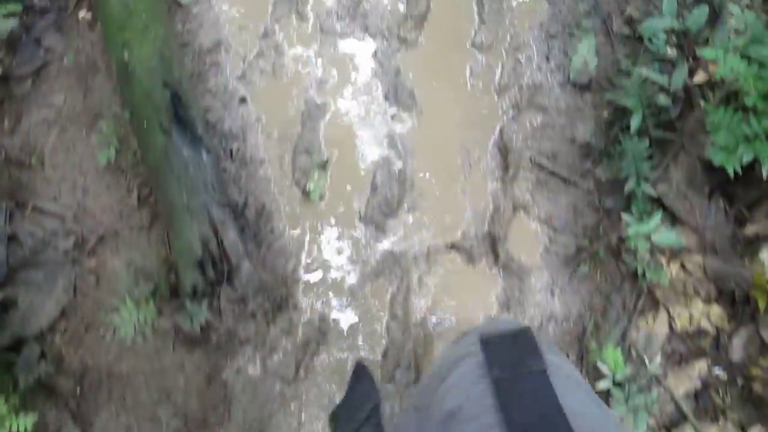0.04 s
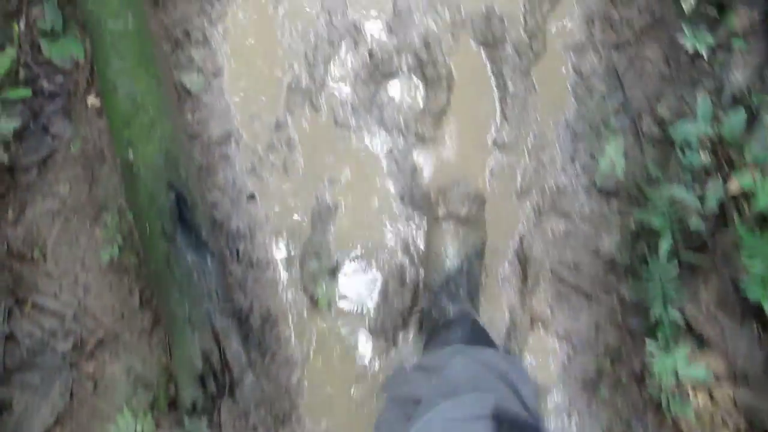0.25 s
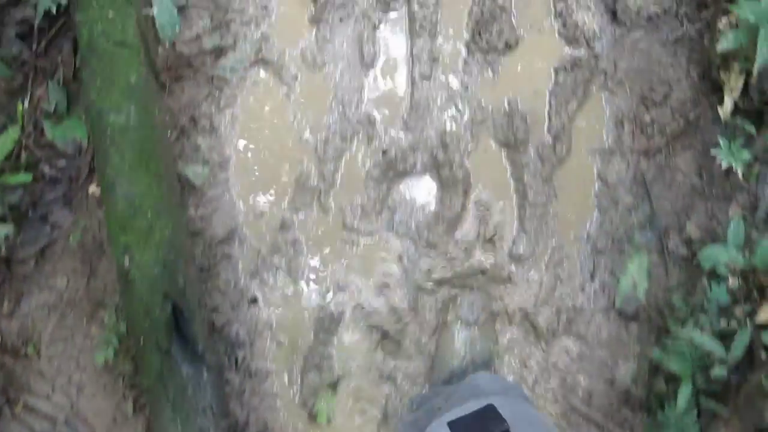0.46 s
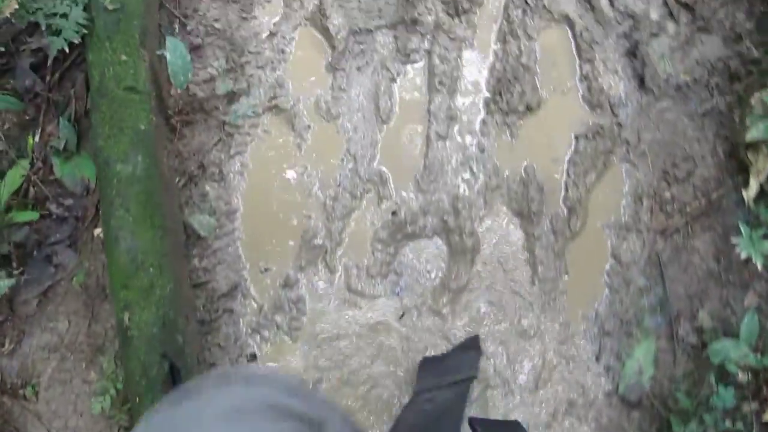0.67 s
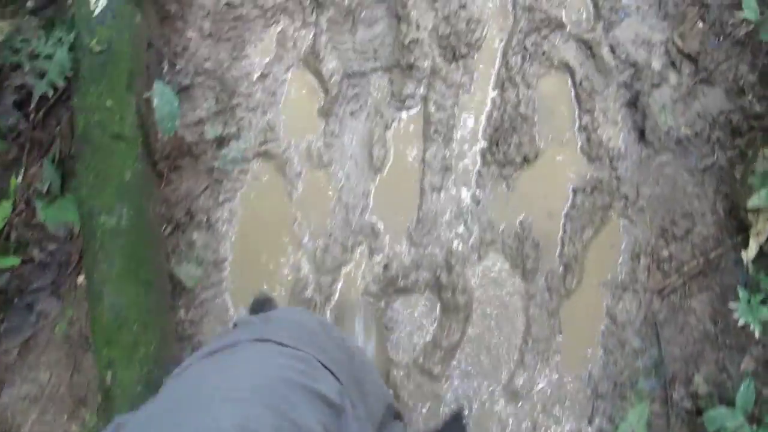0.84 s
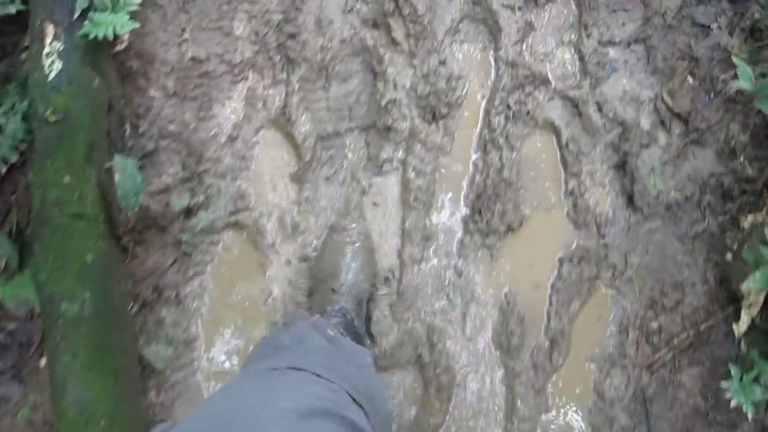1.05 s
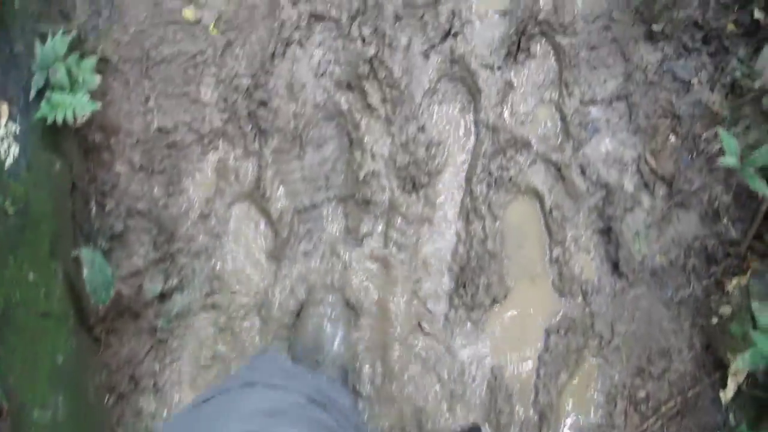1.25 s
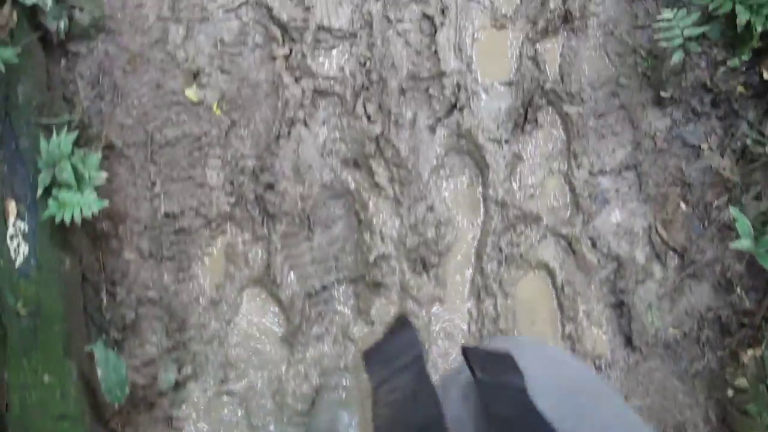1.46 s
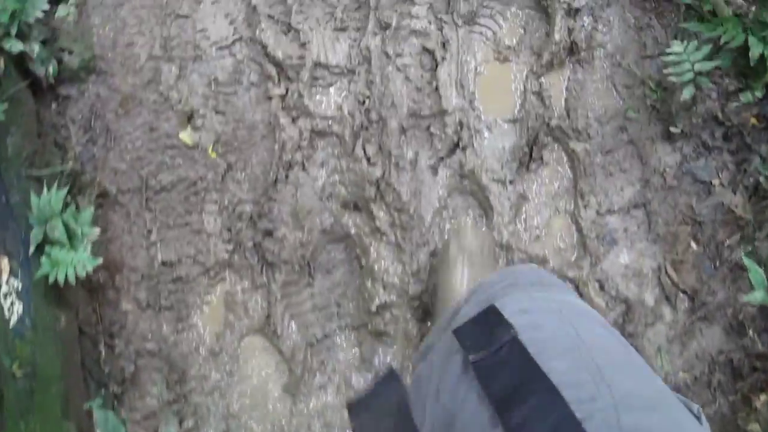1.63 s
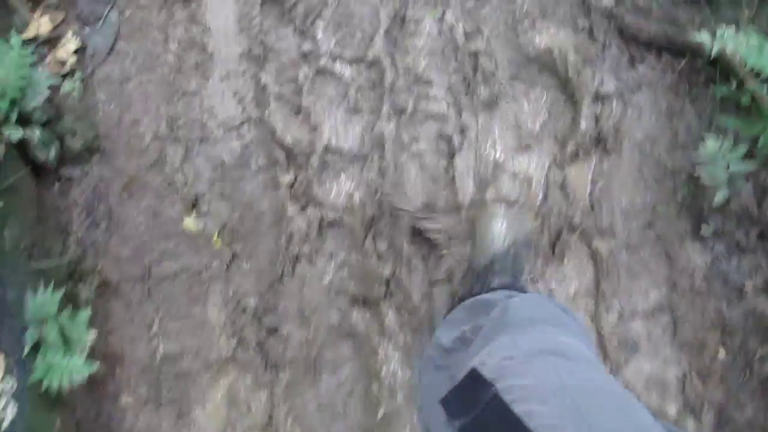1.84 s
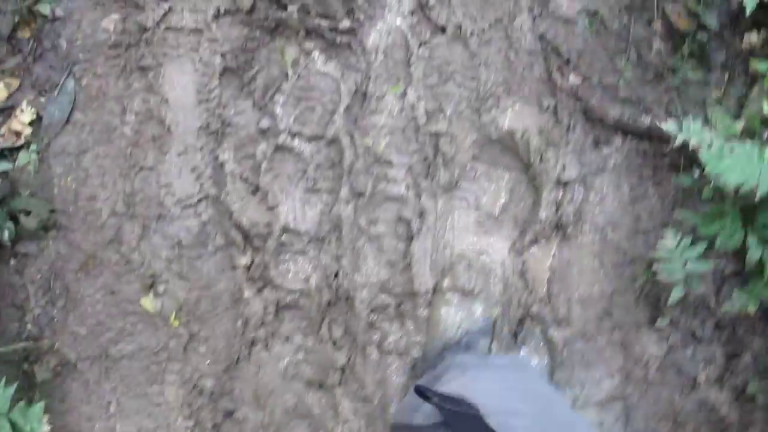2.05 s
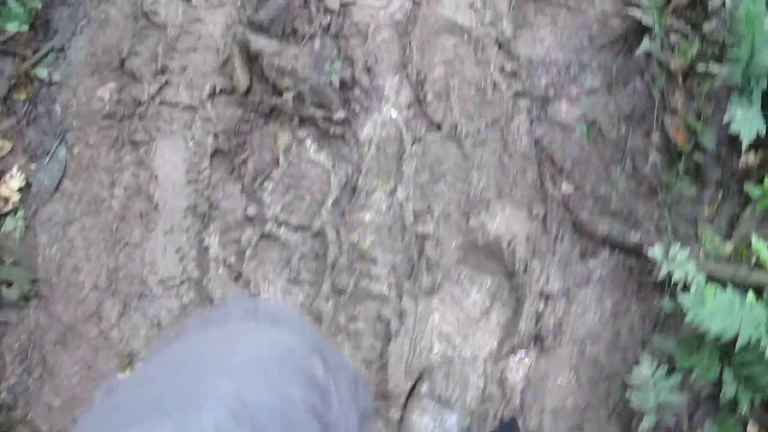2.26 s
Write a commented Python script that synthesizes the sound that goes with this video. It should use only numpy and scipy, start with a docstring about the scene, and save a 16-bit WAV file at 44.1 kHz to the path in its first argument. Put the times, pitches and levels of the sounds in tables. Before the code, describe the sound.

Boots squelching through wet mud, three steps, over a faint hiss of forest insects.

```python
"""Rubber boots in wet mud.

Three steps on a forest trail. Each squeezes out clouds of tiny bursting bubbles; air pockets pop,
a few larger bubbles gulp upward in pitch, and the heel thuds softly. The mud sounds scatter off
legs, ground and trees. Behind them: a faint low rumble and the steady hiss of insects."""
import sys
import numpy as np
from scipy import signal
from scipy.fft import rfft, irfft, next_fast_len
from scipy.io import wavfile
from scipy.ndimage import uniform_filter1d, map_coordinates

SR = 44100
rng = np.random.default_rng(int(sys.argv[2]) if len(sys.argv) > 2 else 0)


def store_wav(level_fs):
    """Save 16-bit WAV to argv[1]."""
    pcm = np.round(np.clip(np.atleast_2d(level_fs), -1, 1) * 32767)
    wavfile.write(sys.argv[1], SR, pcm.T.astype(np.int16))


N = 105840

# Mud and water squirting under the boots. Each row: peak time, rise and fall in seconds,
# level in dB, bubble pitch in Hz, pitch spread in octaves.
SQUIRTS = [ (.236, 0.026, .018, -37, 5930, 0.8), (.29, 0.013, 0.011, -25, 4760, 0.64),
           (0.332, 0.014, 0.01, -36, 2040, 0.68), (0.369, 0.0088, 0.022, -24.5, 2770, 0.56),
           (0.395, 0.048, 0.028, -27.5, 3760, 0.82), (0.464, 0.044, 0.027, -40.5, 3200, 0.46),
           (0.475, .008, 0.0063, -38, 760, 0.16), (0.524, 0.021, 0.0064, -37.5, 2100, 0.67),
           (0.556, 0.011, 0.018, -33.5, 3330, 0.77), (.76, 0.087, .06, -41, 4170, 0.53),
           (.78, 0.22, 0.13, -53.5, 730, 0.41), (0.9116, 0.00025, 0.0044, -20, 5400, 1.1),
           (0.9145, 0.00042, 0.0031, -31, 610, 0.75), (0.916, 0.0042, 0.011, -23.5, 4900, 0.37),
           (0.944, 0.029, .03, -31, 4060, 0.64), (0.947, 0.004, 0.012, -34, 1200, 0.7),
           (1.016, 0.011, 0.01, -34.5, 6840, 0.43), (1.058, 0.0033, 0.0031, -18, 3480, 0.71),
           (1.108, 0.043, 0.025, -28, 4000, 0.82), (1.18, 0.054, 0.055, -40, 2900, 0.53),
           (1.271, 0.014, 0.006, -38, 3920, 0.87), (1.43, 0.21, 0.11, -43, 3720, 0.71),
           (1.539, 0.014, 0.022, -41, 3720, .9), (1.675, 0.014, 0.0065, -27.5, 4070, 0.81),
           (1.691, 0.0031, 0.0024, -17.5, 5500, 1.07), (1.702, 0.017, 0.089, -31.5, 4070, 0.62),
           (1.763, 0.0046, 0.022, -29.5, 1570, 0.56), (1.795, .014, 0.0098, -28, 1060, 0.27),
           (1.803, 0.023, 0.011, -26, 3360, 0.64), (1.81, .002, 0.0027, -25, 4500, 1.2),
           (1.85, 0.013, 0.0058, -21.5, 3000, 0.65), (1.885, 0.022, 0.014, -36.5, 2600, 0.37),
           (1.914, 0.002, 0.036, -33, 3360, 1.08), (2.035, 0.036, 0.023, -33.5, 3060, 0.92),
           (2.114, 0.011, 0.011, -30.5, 2440, 0.42), (2.158, .022, 0.027, -36.5, 2950, 0.59),
           (2.264, 0.0087, 0.014, -41, 2370, 0.57)]
# Air pockets. Each row: start in seconds, level in dB, pitch in Hz, swell in cycles.
POPS = [ (0.199, -25, 1670, 0.3), (0.2668, -21, 3380, .45), (.268, -27.5, 530, 0.31),
        (0.2815, -23.5, 920, .25), (.3232, -20, 3800, .6), (0.3232, -25, 1180, .7), (.333, -21, 1800, 1.4),
        (.347, -19, 3760, 0.99), (0.3655, -16, 3080, 0.43), (0.3682, -3.5, 2900, 0.5),
        (.3762, -20.5, 900, 0.29), (0.3758, -10, 6060, .7), (0.386, -13, 4170, 0.79),
        (0.394, -10.5, 1620, 0.76), (0.428, -25, 2500, 2.6), (0.46, -28.5, 920, 0.43),
        (.4996, -14.5, 3950, 0.29), (0.506, -20, 2610, 0.32), (.5534, -20.5, 3350, 0.34),
        (0.556, -27.5, 2960, 3.7), (.577, -24, 2640, 0.39), (.639, -30, 2580, 1.8), (.739, -22, 4800, 0.25),
        (.776, -15.5, 4460, 0.36), (.9118, -15.5, 590, 0.23), (0.9109, -12, 3110, 1.26),
        (0.984, -21, 5200, 0.59), (1.006, -33, 4800, .6), (1.039, -27, 2640, 2.7), (1.0561, -9.5, 2500, .4),
        (1.0576, -20, 3400, 0.3), (1.083, -16, 2520, 0.73), (1.0832, -22.5, 760, 0.39),
        (1.1025, -22, 4100, 0.33), (1.114, -24, 700, 0.28), (1.1169, -15.5, 1970, 0.45),
        (1.1227, -21, 5100, 0.79), (1.1931, -28, 4230, 2.9), (1.2615, -26, 5060, 1.3),
        (1.396, -25.5, 5500, 1.8), (1.4244, -54, 4500, 1.5), (1.4248, -9.5, 3980, 0.43),
        (1.451, -21, 5040, 0.35), (1.476, -19.5, 4500, 0.18), (1.533, -23, 4070, 0.3),
        (1.589, -29, 3500, .5), (1.6863, -8, 2730, 0.68), (1.6898, -8, 2840, 1.1),
        (1.6898, -15.5, 940, 0.73), (1.757, -17, 2090, 0.83), (1.798, -15, 3600, 0.3),
        (1.811, -24, 3720, 0.81), (1.827, -13.5, 3040, 1.4), (1.827, -24.5, 446, 0.23),
        (1.849, -15.5, 3130, 2), (1.859, -22, 2620, .9), (1.88, -30.5, 1020, 0.77),
        (1.9094, -21, 3040, 1.2), (1.9087, -18, 6540, 0.45), (1.9191, -20.5, 1620, 0.37),
        (1.931, -23, 3180, 0.87), (1.97, -20, 6700, 1.6), (2.013, -25, 5300, 1.8),
        (2.0321, -15, 2400, 0.23), (2.11, -17, 2800, 1.2), (2.114, -21.5, 2430, 1.5),
        (2.133, -18.5, 2750, 0.66)]
# Large bubbles. Each row: start in seconds, level in dB, first and last pitch in Hz,
# glide and decay in seconds.
GULPS = [(.539, -26.5, 810, 1165, 0.0049, 0.0052), (1.128, -18, 810, 1290, 0.005, 0.0054),
         (1.23, -27, 654, 1287, 0.016, .012), (1.76, -15.5, 660, 1466, 0.0059, 0.0034),
         (1.778, -19, 690, 960, 0.0036, 0.005), (1.792, -29, 855, 1140, 0.0088, 0.0069),
         (1.818, -25, 1380, 1550, .006, 0.0098)]
# Heels and soles on soft ground. Each row: start in seconds, level in dB, pitch in Hz, swell in seconds.
THUDS = [(.072, -36.5, 130, .009), (.243, -29.5, 120, 0.0042), (0.261, -31, 50.3, 0.0043),
         (.558, -38, 89.5, 0.003), (0.969, -27, 81, 0.0037), (1.258, -39.5, 290, 0.004),
         (1.588, -36, 196, 0.0066), (1.932, -21.5, 126, 0.0042)]
# Direction of the mud sounds. Each row: time in seconds, left minus right in dB.
MUD_PAN = [(.3, -1.5), (.55, -0.5), (1.05, -1.5), (1.45, 3), (1.7, -2), (2.03, -0.5), (2.11, 8.5),
           (2.3, 10.5)]
# Low rumble envelope. Each row: time in seconds, level in dB.
RUMBLE_LEVEL = [(0, -57), (.17, -55), (.27, -44), (.45, -62.5), (.9, -49), (1.02, -45), (1.2, -61),
                (1.5, -58), (1.8, -58), (2.2, -46.5), (2.4, -55)]
# Forest and insect hiss. Each row: frequency in Hz, relative density in dB.
FOREST_SPECTRUM = [(25, -11), (60, -11), (130, -2), (230, -1), (450, -1.5), (800, -7), (1500, -9.5),
                   (3300, -13), (4500, -7.5), (6300, -11.5), (7100, -8.5), (7900, -4), (8700, -13.5),
                   (10000, -14.5), (15000, -14.5)]
# Slow drift of the hiss. Each row: time in seconds, gain in dB.
FOREST_DRIFT = [(0, 1.5), (.8, 1), (1.4, -1), (2.1, 1), (2.4, -2)]
# Diffuse sound at the two microphones. Each row: frequency in Hz, coherence from 0 to 1.
COHERENCE = [(30, 0.5), (130, 0.94), (500, 0.98), (1400, 0.91), (3100, 0.56), (6000, 0.01)]
# Microphone ports, left then right. Each row: resonance in Hz, Q.
MIC_PORTS = [(5400, 2.67), (8000, 4.1)]
# Response shared by both microphones. Each row: frequency in Hz, gain in dB.
MIC_RESPONSE = [(100, -3), (1000, -0.5), (3000, -0.5), (5000, 1), (8000, 1), (10000, 0), (12000, -1),
                (15500, -4.5)]


def squelch(rate_per_s, cycles, scatter_db, bands=28, max_bubbles=1400):
    """Bubble clouds burst under each squirt; the rate per band grows with the root of its pitch."""
    peak_s, rise_s, fall_s, db, centre_hz, spread_oct = np.transpose(SQUIRTS)[:, :, None]
    pitches_hz, out = np.geomspace(250, 14000, bands), np.zeros(N)
    shares = np.exp(-.5 * (np.log2(pitches_hz / centre_hz) / spread_oct) ** 2)
    shares /= shares.sum(1, keepdims=True)
    for hz, share in zip(pitches_hz, shares.T):
        count = max(int(rate_per_s * np.sqrt(hz / pitches_hz.mean()) * N / SR), 2)
        starts = rng.random(max_bubbles)[:count] * N
        excess = rng.exponential(1, max_bubbles)[:count]
        signs = rng.choice([-1, 1], max_bubbles)[:count]
        age_s = starts / SR - peak_s
        squirt_power = amp(db) ** 2 * np.exp(-2 * np.maximum(-age_s / rise_s, age_s / fall_s))
        gains = unit(signs * amp(scatter_db * np.minimum(excess, 3)))
        gains *= np.sqrt(share @ squirt_power * N / len(starts))
        ring = bubble(hz, cycles * 2 ** rng.uniform(-0.54, 1), size=512)
        ring /= np.linalg.norm(ring)
        indices = starts.astype(int)[:, None] + np.arange(len(ring))
        out += np.bincount(indices.ravel(), np.outer(gains, ring).ravel(), N)[:N]
    return out


def bubble(hz, cycles, size=2048, pitch_creep=0.0072):
    """A damped bubble: peaks after `cycles`, then dies, its pitch creeping up."""
    turns = hz * np.arange(size) / SR
    age = turns / max(cycles, .1)
    return age * np.exp(1 - age) * np.sin(2 * np.pi * turns * (1 + pitch_creep * np.minimum(age, 10)))


def pops(main_db=-1, spatter_db=-19.5, spatter_s=0.00067, follow_db=-10, follow_s=.004, detune_oct=0.33):
    """Air pockets break open, each setting off a droplet spatter and three weaker neighbours."""
    out, t = np.zeros(N), np.arange(2048) / SR
    for start_s, db, hz, cycles in POPS:
        spatter = unit(np.diff(rng.standard_normal(len(t) + 1))) * np.exp(-t / spatter_s)
        add(out, start_s, amp(db) * (amp(main_db) * bubble(hz, cycles) + amp(spatter_db) * spatter))
        for lag, detune in rng.random((3, 2)):
            neighbour = bubble(hz * 2 ** (detune_oct * (2 * detune - 1)), 1.6 * cycles)
            add(out, start_s + follow_s * lag, amp(db + follow_db - 5.8 * lag) * neighbour)
    return out


def gulps(attack_s=0.0014):
    """Large bubbles ring and rise in pitch as they surface."""
    out, t = np.zeros(N), np.arange(SR // 10) / SR
    for start_s, db, first_hz, last_hz, glide_s, decay_s in GULPS:
        hz = last_hz + (first_hz - last_hz) * np.exp(-t / glide_s)
        envelope = (1 - np.exp(-t / attack_s)) * np.exp(-t / decay_s)
        add(out, start_s, amp(db) * envelope * np.sin(2 * np.pi * np.cumsum(hz) / SR))
    return out


def heel_thuds(push_db=-5, ground_db=-9, cutoff_hz=200, rise_s=0.0041, fall_s=.011):
    """A low push and a dull ground rumble as the weight lands or shifts."""
    out, t = np.zeros(N), np.arange(6000) / SR
    for start_s, db, hz, swell_s in THUDS:
        push = bubble(hz, hz * swell_s, size=len(t))
        ground = unit(lowpass(rng.standard_normal(len(t)), cutoff_hz))
        ground *= (1 - np.exp(-t / rise_s)) * np.exp(-t / fall_s)
        add(out, start_s, amp(db) * (amp(push_db) * push + amp(ground_db) * ground))
    return out


def echo(x, decay_s, width, side_hz=1330, size=16384):
    """Diffuse reflections, down by 1/e in decay_s; width adds antiphase treble."""
    t = np.arange(size) / SR
    side = signal.sosfilt(signal.butter(1, side_hz, "high", fs=SR, output="sos"),
                          rng.standard_normal(size))
    envelope = np.exp(-t / decay_s) * (1 - np.exp(-10 * t / decay_s))
    tail = (diffuse(size) + width * np.array([side, -side])) * envelope
    return signal.fftconvolve(x[None], tail / np.linalg.norm(tail[0]), axes=1)[:, :N]


def low_rumble(cutoff_hz=330):
    """Faint low noise that swells and fades."""
    return unit(lowpass(diffuse(N), cutoff_hz)) * amp(over_time(RUMBLE_LEVEL))


def forest(level_db=-45.5, patch_db=2.1):
    """Insect hiss over a low wash, wavering in small patches of time and pitch."""
    hz, _, spectra = signal.stft(diffuse(N), SR, nperseg=1024, noverlap=768)
    patches = uniform_filter1d(rng.standard_normal(spectra.shape[1:]), size=9, axis=0)
    patches = unit(uniform_filter1d(patches, size=14, axis=1))
    spectra *= amp(over_frequency(FOREST_SPECTRUM, hz)[:, None] + patch_db * patches)
    hiss = signal.istft(spectra, SR, nperseg=1024, noverlap=768)[1][:, :N]
    return amp(level_db + over_time(FOREST_DRIFT)) * unit(hiss)


def diffuse(size):
    """Two white noises, alike in the bass, unrelated in the treble."""
    left, other = rfft(rng.standard_normal((2, size)))
    coherence = over_frequency(COHERENCE, np.fft.rfftfreq(size, 1 / SR))
    right = coherence * left + np.sqrt(1 - coherence ** 2) * other
    return irfft(np.array([left, right]), size)


def place(x, pan_db, max_lead_s=5e-5, knee_db=3.5):
    """Sound is louder and earlier at the nearer microphone."""
    shift = max_lead_s * SR * np.tanh(pan_db / knee_db) / 2
    return np.array([amp(side * pan_db / 2) * map_coordinates(x, [np.arange(N) + side * shift], order=3)
                     for side in (1, -1)])


def amp(db):
    return 10 ** (np.asarray(db) / 20)


def unit(x):
    """Scales to rms 1."""
    return x / np.sqrt(np.mean(x ** 2) + 1e-20)


def lowpass(x, hz):
    return signal.sosfilt(signal.butter(2, hz, fs=SR, output="sos"), x)


def over_time(table):
    return np.interp(np.arange(N) / SR, *np.transpose(table))


def over_frequency(table, hz):
    table_hz, values = np.transpose(table)
    return np.interp(np.log(hz + 1), np.log(table_hz + 1), values)


def add(mix, start_s, sound):
    part = mix[max(round(start_s * SR), 0):][:len(sound)]
    part += sound[:len(part)]


def scene(sole_edge_db=1.96):
    """Steps squirting from both edges of the sole, their echoes, and the forest."""
    pan_db = over_time(MUD_PAN)
    mud = place(pops() + gulps(), pan_db)
    for edge in (1, -1):
        fizz = amp(-3.5) * squelch(rate_per_s=230, cycles=0.49, scatter_db=3.5)
        plips = amp(-8) * squelch(rate_per_s=36, cycles=2.06, scatter_db=3)
        mud += place(fizz + plips, pan_db + edge * sole_edge_db)
    mono = mud.mean(0)
    near_echo = amp(-11.5) * echo(mono, decay_s=0.0051, width=1.5)  # legs and ground
    tree_echo = amp(-14.5) * echo(mono, decay_s=0.07, width=0.47)
    return mud + near_echo + tree_echo + heel_thuds() + low_rumble() + forest()


def record(dry, cutoff_hz=15800):
    """Each microphone's port resonance, the shared response, then the band limit."""
    size = next_fast_len(N + 4096)
    hz = np.fft.rfftfreq(size, 1 / SR)
    ports = np.array([1 / (1 - (hz / port_hz) ** 2 + 1j * hz / (port_hz * q))
                      for port_hz, q in MIC_PORTS])
    heard = irfft(rfft(dry, size) * ports * amp(over_frequency(MIC_RESPONSE, hz)), size)[:, :N]
    band_limit = signal.firwin(511, cutoff_hz, window=("kaiser", 9), fs=SR)
    return signal.oaconvolve(heard, band_limit[None], "same")


dry = scene()
out = record(dry)
store_wav(out)
```